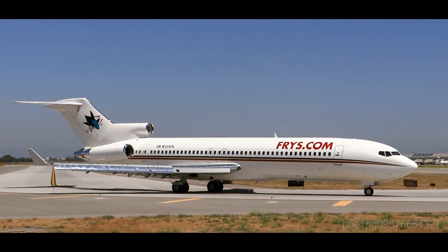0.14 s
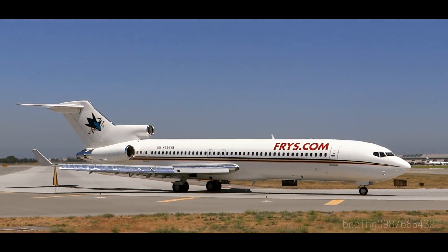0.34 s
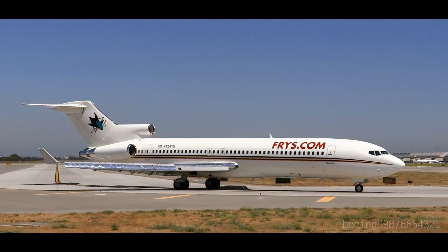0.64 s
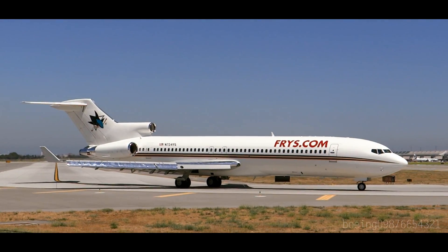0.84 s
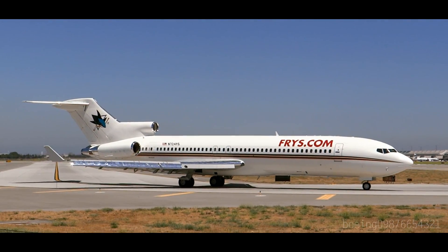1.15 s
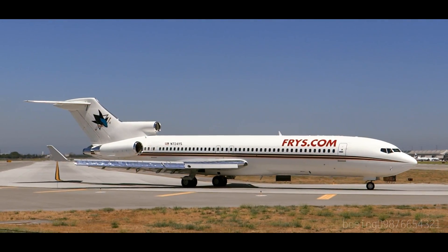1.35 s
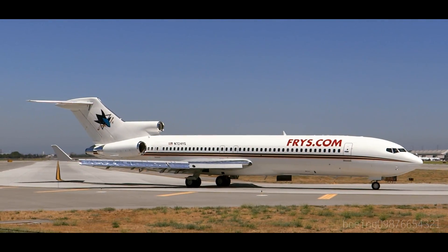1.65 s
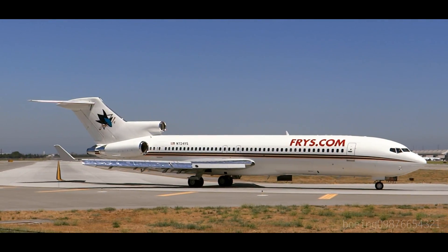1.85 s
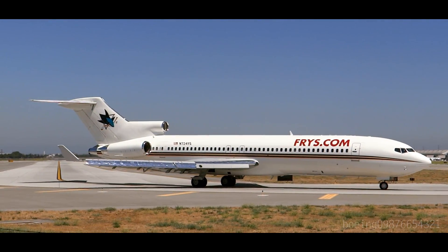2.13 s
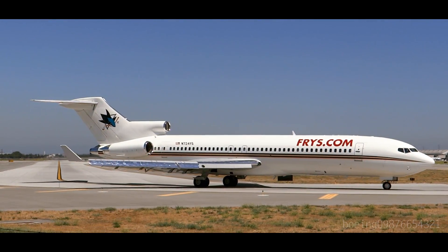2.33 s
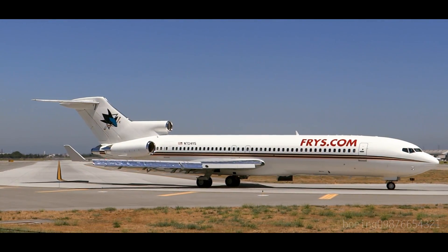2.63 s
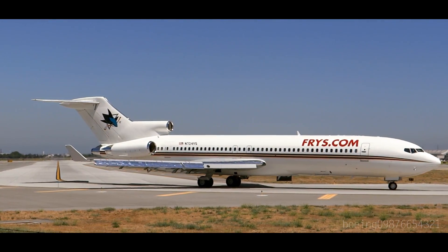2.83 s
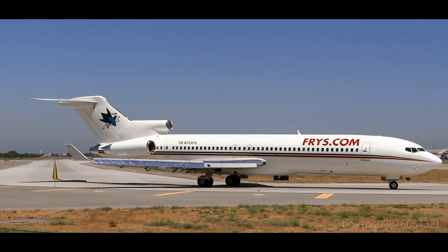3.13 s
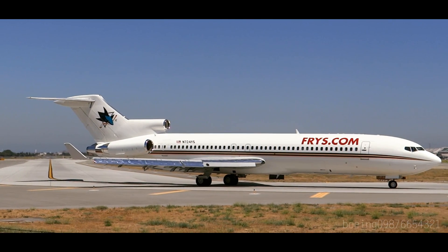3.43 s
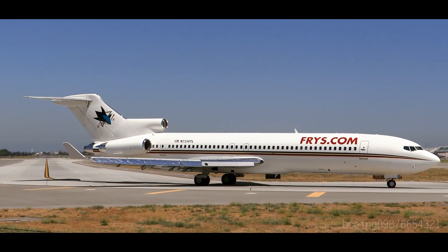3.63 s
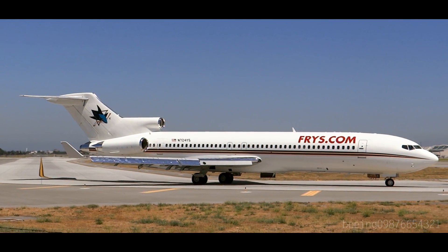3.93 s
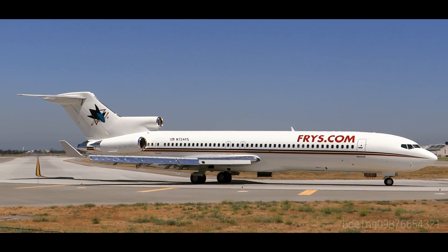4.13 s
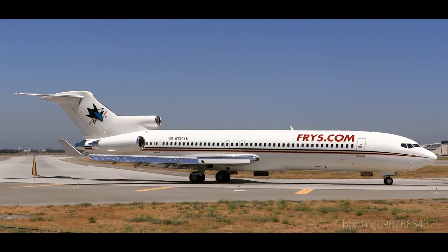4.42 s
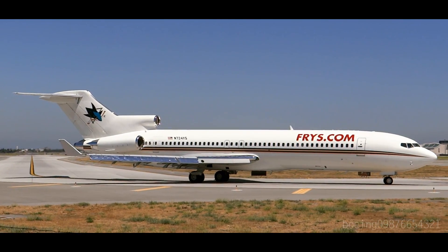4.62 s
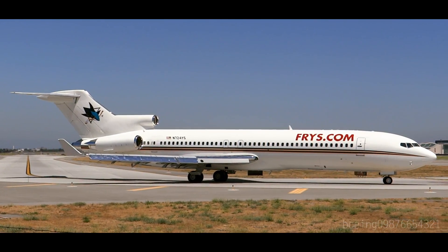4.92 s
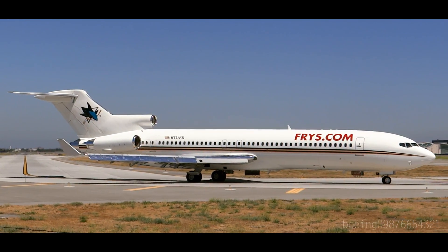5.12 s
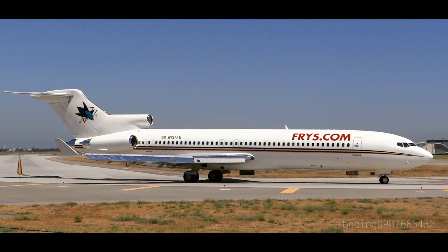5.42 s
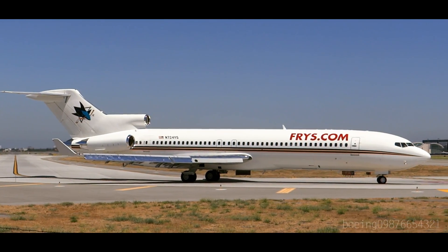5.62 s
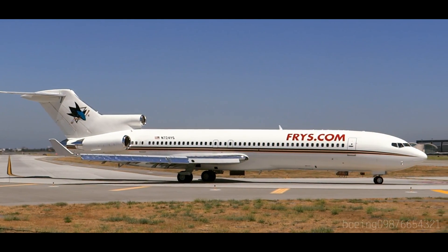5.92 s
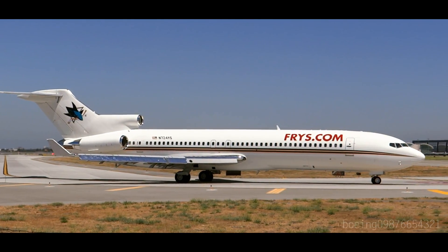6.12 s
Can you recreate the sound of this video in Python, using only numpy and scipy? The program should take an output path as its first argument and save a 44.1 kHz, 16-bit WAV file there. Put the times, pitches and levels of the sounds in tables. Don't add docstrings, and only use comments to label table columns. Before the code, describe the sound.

Shrill, wavering turbine whine over a dense, bright rush of jet noise as an airliner rolls past at idle, level and unbroken throughout.

```python
import sys
import numpy as np
from scipy import signal
from scipy.fft import rfft, irfft, next_fast_len
from scipy.io import wavfile
from scipy.ndimage import uniform_filter1d, map_coordinates

SR = 44100
rng = np.random.default_rng(int(sys.argv[2]) if len(sys.argv) > 2 else 0)


def unload_audio(sound):
    columns = np.transpose(np.atleast_2d(sound))
    steps = np.round(np.clip(columns, -1, 1) * 32767)
    wavfile.write(sys.argv[1], SR, steps.astype(np.int16))


def natural_amplitude(level_db):
    exponent = np.asarray(level_db, float) / 20
    return 10 ** exponent


N = 276066
TIME = np.arange(N) / SR

# t/s, rate/(turns/s)
SHAFT_SPEED = [(0.0, 49.878), (1.8, 49.874), (4.2, 49.994), (5.4, 50.024), (5.9, 50.0), (6.26, 50.0)]

# f/Hz, level/dB per Hz
RUSH_COLOUR = [(30, -74), (100, -64), (125, -50.5), (260, -56), (340, -49.5), (700, -49.5), (1300, -49.5),
               (2100, -41.5), (3300, -41.5), (4500, -47.5), (6000, -59.5), (9000, -73), (11500, -82),
               (13500, -100)]
# f/Hz, level/dB
RUSH_WIDTH = [(30, -18), (120, -25.5), (350, -25.5), (700, -21.5), (2000, -21), (3500, -14.5),
              (7000, -12.5), (10100, -12.5), (13000, -19.5)]
# t/s, swell of the rush/dB, clearing of the air at the top of the hiss/dB
RUSH_SWELLS = [(0.0, 1, 2.5), (.35, 2.5, -6.5), (.58, 4, -3.5), (.87, 2, 1.5), (1.12, 1.5, 3.5), (1.32, 2, -1),
               (1.9, 0.5, 1), (2.25, -1.5, 3.5), (2.75, 0, 2), (2.97, -1, -5), (3.15, 0.5, -0.5), (3.65, 3, -2),
               (4.1, 2.5, -1), (4.55, -1, -7), (4.8, 2, -9.5), (5.5, 1.5, -1), (5.97, -1.5, -9.5),
               (6.26, -1.5, 5)]
# t/s, lag/ms
AIRFRAME_LAG = [(0, 1.85), (.9, 1.66), (2.5, 1.667), (4, 1.66), (5.2, 1.697), (6.26, 1.6)]
RUSH_DB = -19
PAVEMENT_S, PAVEMENT_SHARE, PAVEMENT_HZ = 0.002196, 0.22, 1360
CLEAR_FROM_HZ, CLEAR_FULL_HZ = 1670, 6760
INLET_HZ, INLET_DB, INLET_SINK_S = 2440, 2, 1.1
BODY_SHARE, BODY_HZ = 0.24, 3500
WING_SHARE, WING_HZ, WING_TOP_HZ, WING_LEAD_MS = 0.39, 2600, 9500, 0.165

BUZZ_DB, BUZZ_TILT_DB = -44, -16

FAINT_ORDERS = (27, 78, 80, 81, 94, 107, 120, 121, 128, 131, 134, 147)
FAINT_ORDER_DB = (-45, -45, -45, -45, -46, -52, -55, -56, -59, -61, -54, -63)
FAINT_HZ = (116, 1340, 2444, 2544, 2680, 2970, 3231, 3783, 3840, 4414, 4887, 5123, 5338, 5753, 5986, 6385,
            7331, 7960)
FAINT_HZ_DB = (-56, -44, -41, -42, -40, -44, -41, -42, -45, -45, -51, -47, -50, -54, -55, -58, -62, -61)

# f/Hz, level at the start/dB
RECEDING = [(3093, -35), (4440, -34)]
RECEDE_DB_PER_S = 2.2

SIDE_ORDERS = (40, 64, 91, 108)
SIDE_HZ = (1891.7, 1622, 2207, 2600)
SIDE_DB = (-27.5, -27, -40, -56, -27.5, -41.5, -32, -32.5)
# centre t/s, length/s, change/dB
SIDE_EDDIES = [
    [(.58, .2, -7.5), (1.8, 0.32, -3.5), (2.15, 0.23, -17), (2.75, 0.35, -16), (4.4, 0.87, 8),
     (5.8, 0.71, 2.5)],
    [(.3, 1, -25), (1.72, 0.15, -10), (2.12, 0.057, 4.5), (2.42, 0.09, 4), (3.63, .12, -1), (4.6, .35, 6.5),
     (5.75, 1.8, -10)],
    [(.35, 0.58, -8), (1.0, 0.47, 10), (1.74, 0.2, 16), (3.6, 0.19, 6), (4.33, 0.19, 8), (5.0, 0.94, 4.5),
     (5.8, 0.35, -7)],
    [(.1, 0.64, 19), (.8, 0.3, 21), (2.3, 0.46, 15.5)],
    [(.1, .7, -14), (2.4, 1, -7), (3.5, 0.18, -15), (6.15, 0.44, -4)],
    [(1.5, 0.48, 14.5), (3.55, 0.29, 13.5), (5.05, .45, 5)],
    [(3.5, 0.67, 3), (4.17, 0.18, -20), (4.85, .4, -22.5), (5.8, 1, -12.5)],
    [(.6, .25, 0), (1.65, 0.52, -16), (2.55, 0.4, -26), (3.45, 0.93, -18), (4.17, 0.45, -23),
     (5.0, 0.24, -27)],
]

FIRST_BLADES, SECOND_BLADES = 54, 67
# t/s, level/dB
FIRST_STAGE = [(0, -22.5), (.45, -18.5), (.7, -21), (.95, -20), (1.11, -31), (1.25, -26), (1.41, -40),
               (1.52, -22), (1.75, -25), (1.95, -17.5), (2.25, -17.5), (2.62, -22.5), (2.75, -20),
               (3.9, -23), (4.3, -31.5), (4.85, -18.5), (5.55, -15.5), (6.26, -13)]
# t/s, level/dB
SECOND_STAGE = [(0, -22), (.22, -18.5), (.4, -20), (.6, -27.5), (.95, -26), (1.12, -18), (2.5, -14.5),
                (2.93, -13.5), (3.5, -15.5), (3.65, -26), (3.85, -22.5), (3.95, -18.5), (4.45, -14),
                (4.75, -15.5), (4.95, -18.5), (5.15, -12.5), (6.13, -16), (6.19, -30)]
# centre t/s, length/s, change/dB
STAGE_EDDIES = [
    [(3.03, 0.11, 3), (3.43, 0.13, -9), (5.05, 0.18, -3.5)],
    [(2.02, 0.098, -6), (2.22, 0.1, -10), (2.42, 0.069, -4.5), (2.75, 0.13, -2.5), (4.04, 0.14, -3),
     (5.5, 0.31, -10), (5.86, .1, -6)],
]

# t/s, left minus right/dB
PAN = [(0.0, 0.5), (0.7, 0), (1.39, 0), (4.85, 0.0), (6.26, 0.5)]

SIDE_TOP_HZ = 10250
RAGGED_HZ, PATCH_HZ, TOP_HZ = 11600, 400, 15500
OPEN_PER_DB = .2


def columns(table):
    s, *rest = np.transpose(table)
    return [np.interp(TIME, s, c) for c in rest]


def on_log_hz(points, hz):
    p = np.array(points)
    return np.interp(np.log(hz), np.log(p[:, 0]), p[:, 1])


def walk(rate):
    knots = rng.standard_normal(1200)
    coarse = np.interp(TIME[::32] * rate, np.arange(1200), knots)
    drift = uniform_filter1d(coarse, int(SR / 32 / rate / 2) + 1)
    return np.interp(TIME, TIME[::32], drift) / np.sqrt(.5)


def eddies(rows):
    return sum(db * 2 ** -(2 * (TIME - s) / length) ** 2 for s, length, db in rows)


def tone(turns, db, flutter_db, wobble, aside=0.032):
    phase = 2 * np.pi * (turns + rng.random()) + wobble * walk(9)
    gain = np.sqrt(2) * natural_amplitude(db + flutter_db * walk(28)) * (1 + 0.13 * walk(170))
    mid = np.sin(phase)
    side = aside * walk(5) * np.sin(phase + walk(4))
    return gain * np.array([mid, side])


def airframe_echoes(x):
    lag = columns(AIRFRAME_LAG)[0] / 1000 + 1.6e-5 * walk(2.54)
    dull = signal.lfilter(*signal.butter(1, BODY_HZ, fs=SR), x)
    body = BODY_SHARE * np.interp(TIME - lag, TIME, dull)
    bright = signal.filtfilt(*signal.butter(1, [WING_HZ, WING_TOP_HZ], "band", fs=SR), x)
    wing_at = (TIME - lag + WING_LEAD_MS / 1000) * SR
    wing = WING_SHARE * (1 + 0.22 * walk(1.9)) * map_coordinates(bright, [wing_at], mode="mirror")
    return x - body + wing


def rush():
    size = next_fast_len(N, True)
    hz = np.maximum(np.arange(size // 2 + 1) * SR / size, 1)
    echo = PAVEMENT_SHARE / (1 + (hz / PAVEMENT_HZ) ** 2) * np.exp(-2j * np.pi * hz * PAVEMENT_S)
    colour = natural_amplitude(on_log_hz(RUSH_COLOUR, hz)) * (1 + echo)
    mid, side = rfft(rng.standard_normal((2, size))) * colour
    both = np.array([mid, side * natural_amplitude(on_log_hz(RUSH_WIDTH, hz))])
    swell_db, clear_db = columns(RUSH_SWELLS)
    inlet_db = INLET_DB * (np.exp(-TIME / INLET_SINK_S) - .3)
    out, shared = np.zeros((2, N)), walk(40)
    for step in range(48):
        centre = 22 * 2 ** (step / 5)
        angle = 2.5 * np.pi * np.log2(hz / centre)
        band = np.cos(np.clip(angle, -np.pi / 2, np.pi / 2)) ** 2
        clearing = on_log_hz([(CLEAR_FROM_HZ, 0), (CLEAR_FULL_HZ, 1)], centre)
        slow_db = (swell_db + clearing * clear_db) * min(1, (7000 / centre) ** 1.5)
        slow_db += inlet_db * 2 ** -(4 * np.log2(centre / INLET_HZ)) ** 2
        treble = min(centre / 6000, 1)
        flicker_db = (0.96 + 0.1 * treble) * walk(3.445) + treble * (0.8 * shared + 2.07 * walk(60))
        mid_db = slow_db + flicker_db
        side_db = .6 * mid_db + 2.5 * walk(25)
        out += natural_amplitude(np.array([mid_db, side_db])) * irfft(both * band, size)[:, :N]
    out[0] = airframe_echoes(out[0])
    return out * natural_amplitude(RUSH_DB) / out[0].std()


def buzz(shaft):
    out = np.zeros(N)
    for k in range(30, 160):
        db = BUZZ_DB + BUZZ_TILT_DB * abs(np.log2(k / 58)) + 3 * rng.standard_normal()
        db = db + 4.5 * rng.standard_normal(50)
        level = np.interp(TIME * 7, np.arange(50), natural_amplitude(db))
        out += level * np.sin(2 * np.pi * (k * shaft + rng.random()))
    return out


def faint_tones(shaft):
    out = np.zeros((2, N))
    faint = [k * shaft for k in FAINT_ORDERS] + [hz * TIME for hz in FAINT_HZ]
    for turns, db in zip(faint, [*FAINT_ORDER_DB, *FAINT_HZ_DB]):
        out += tone(turns, db + 1.4 * walk(2.12), flutter_db=0.0, wobble=0.99)
    return out


def receding_tones():
    out = np.zeros((2, N))
    for hz, db in RECEDING:
        out += tone(hz * TIME, db - RECEDE_DB_PER_S * TIME + 3 * walk(4.8), flutter_db=0.5, wobble=.45)
    return out


def side_tones(shaft):
    out = np.zeros((2, N))
    side = [k * shaft for k in SIDE_ORDERS] + [hz * TIME for hz in SIDE_HZ]
    for turns, db, rows in zip(side, SIDE_DB, SIDE_EDDIES):
        out += tone(turns, db + eddies(rows) + 1.4 * walk(11), flutter_db=1.74, wobble=0.3)
    return out


def stage_tones(shaft):
    first_db = columns(FIRST_STAGE)[0] + eddies(STAGE_EDDIES[0]) + 0.57 * walk(15)
    second_db = columns(SECOND_STAGE)[0] + eddies(STAGE_EDDIES[1]) + 0.59 * walk(16)
    first = tone(FIRST_BLADES * shaft, first_db, flutter_db=0.5, wobble=0.077)
    second = tone(SECOND_BLADES * shaft, second_db, flutter_db=0.87, wobble=0.13)
    return first + second


def scene():
    shaft = np.cumsum(columns(SHAFT_SPEED)[0]) / SR
    mid, side = rush() + faint_tones(shaft) + receding_tones() + side_tones(shaft) + stage_tones(shaft)
    mid = mid + buzz(shaft)
    pan_db = columns(PAN)[0]
    side = side + .02 * np.gradient(mid)
    return np.array([mid * natural_amplitude(pan_db / 2) + side, mid * natural_amplitude(-pan_db / 2) - side])


def ragged_top(x):
    size = next_fast_len(N, True)
    hz, spectrum = np.arange(size // 2 + 1) * SR / size, rfft(x, size)
    out = irfft(spectrum * (hz < RAGGED_HZ), size)[:, :N]
    openness = walk(12) - .1 - OPEN_PER_DB * columns(RUSH_SWELLS)[1]
    for low_hz in range(RAGGED_HZ, TOP_HZ, PATCH_HZ):
        need = min((low_hz - 12700) / 450, 1.9)
        is_open = .8 * openness + .6 * walk(14) > need
        gate = uniform_filter1d(1. * is_open, 900)
        patch = (hz >= low_hz) * (hz < low_hz + PATCH_HZ)
        out += gate * irfft(spectrum * patch, size)[:, :N]
    return out


def roll_off(x):
    return signal.sosfilt(signal.butter(12, 15500, fs=SR, output="sos"), x)


def record(dry):
    window = int(.015 * SR)
    power = uniform_filter1d(uniform_filter1d(np.mean(dry ** 2, axis=0), window), window)
    even = dry * (natural_amplitude(-13) / np.sqrt(power)) ** .4
    left, right = np.tanh(.48 * even) / .48
    side_filter = signal.ellip(6, .1, 6, SIDE_TOP_HZ, fs=SR, output="sos")
    side = signal.sosfiltfilt(side_filter, left - right)
    mix = ragged_top(np.array([left + right + side, left + right - side]) / 2)
    return roll_off(mix)


dry = scene()
out = record(dry)
unload_audio(out)
```